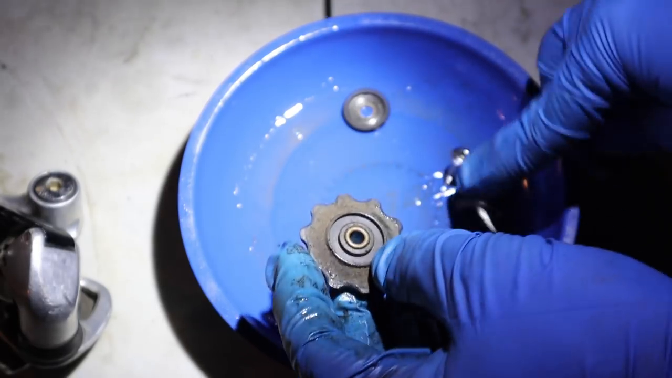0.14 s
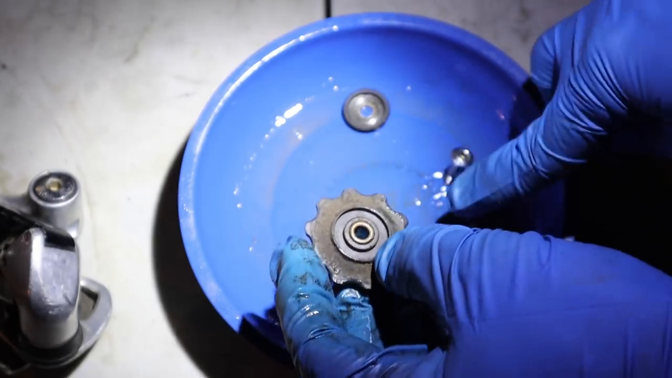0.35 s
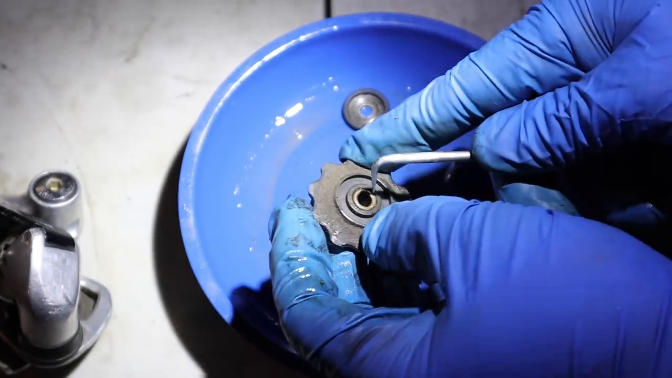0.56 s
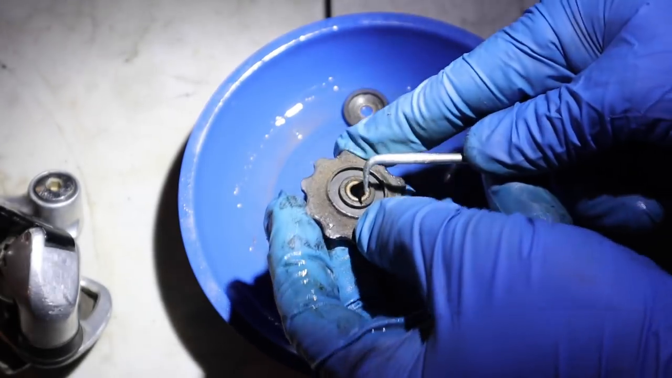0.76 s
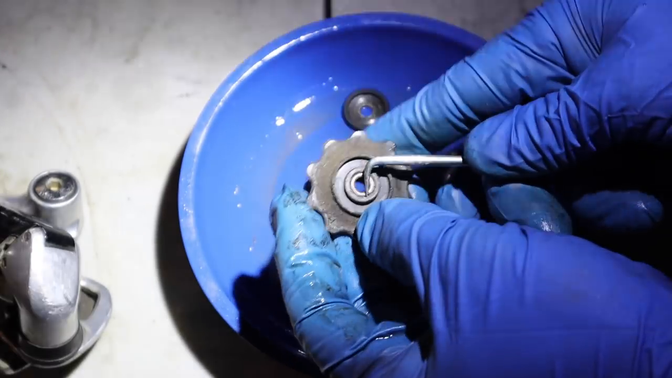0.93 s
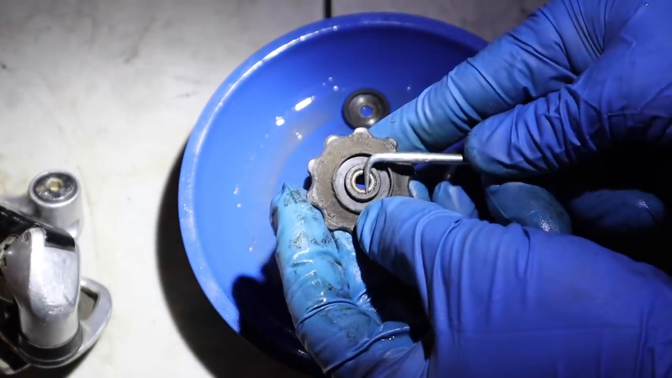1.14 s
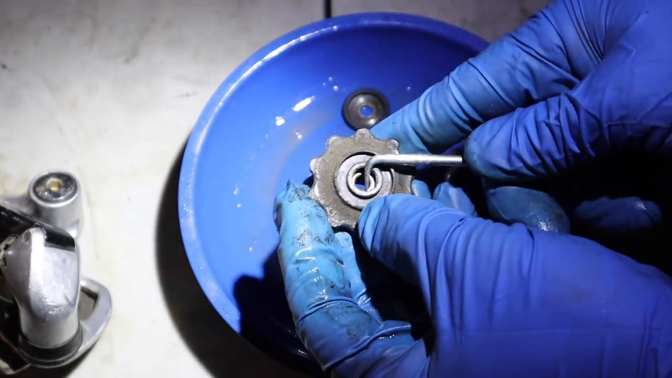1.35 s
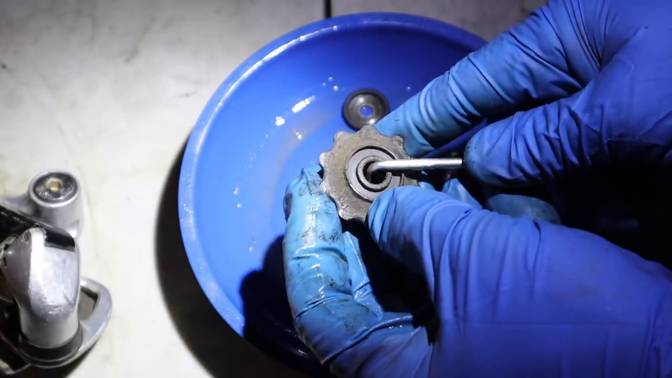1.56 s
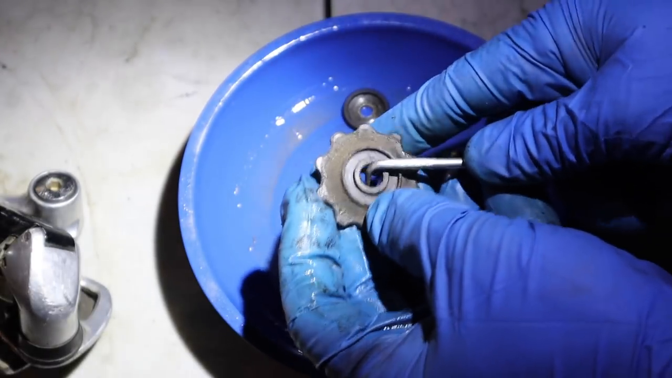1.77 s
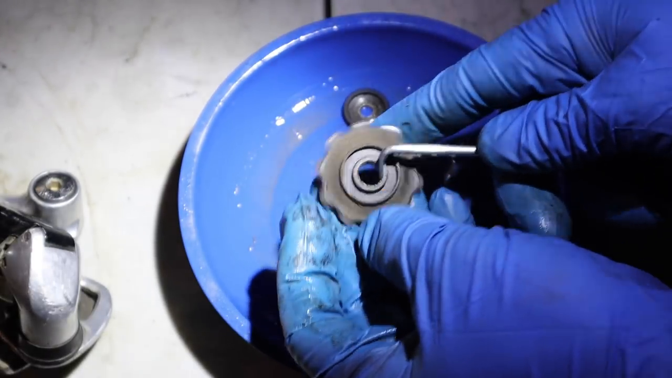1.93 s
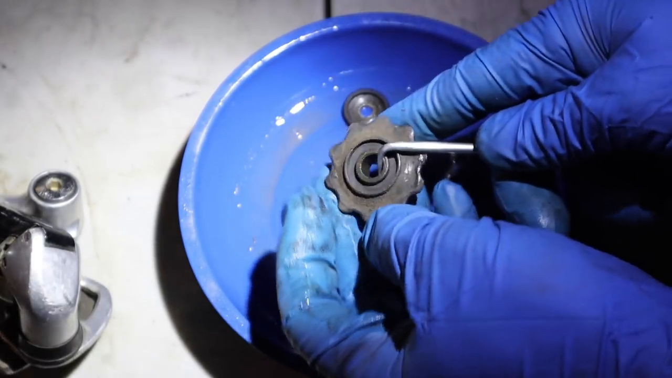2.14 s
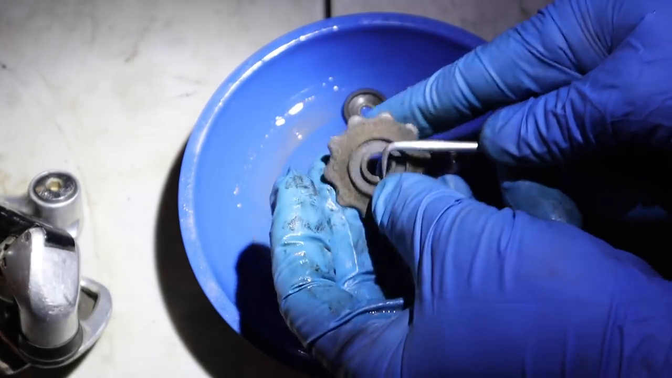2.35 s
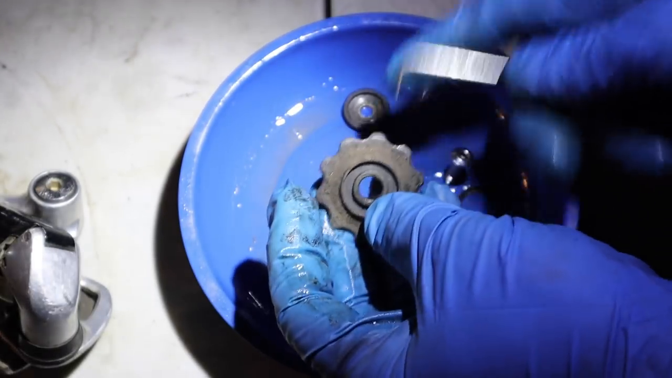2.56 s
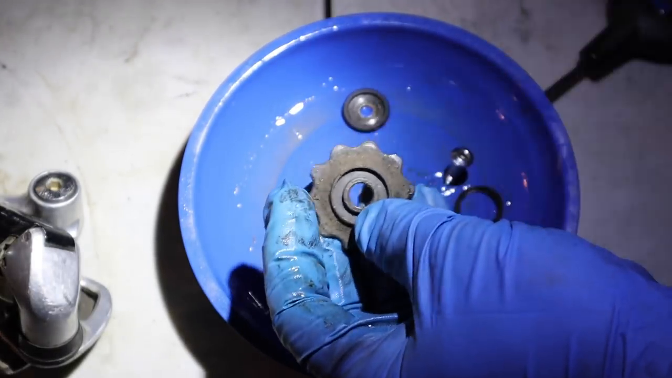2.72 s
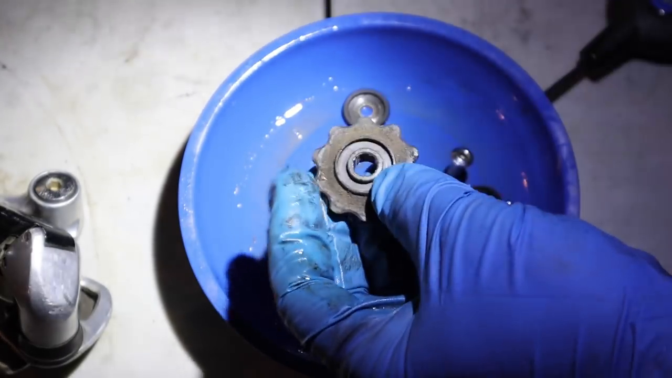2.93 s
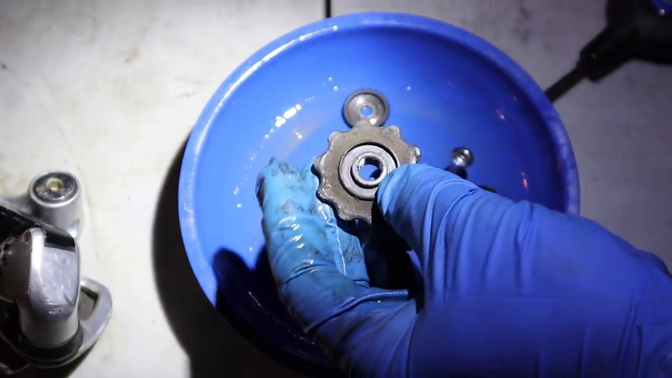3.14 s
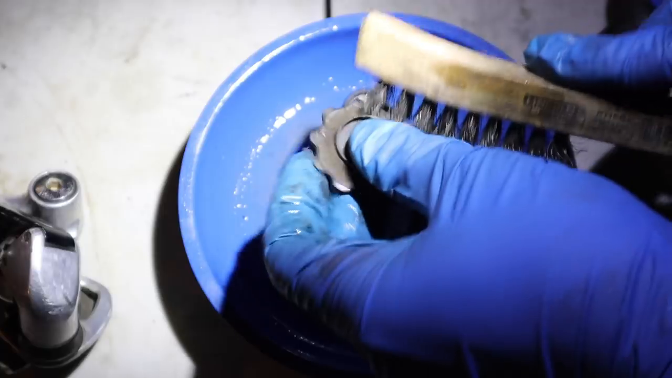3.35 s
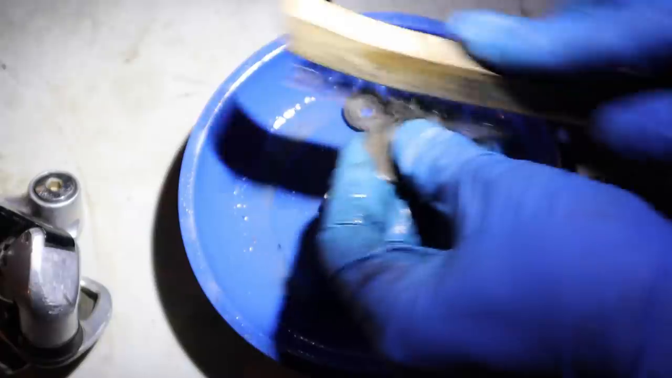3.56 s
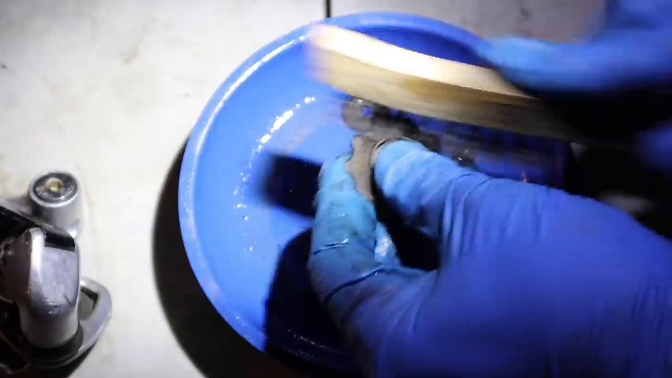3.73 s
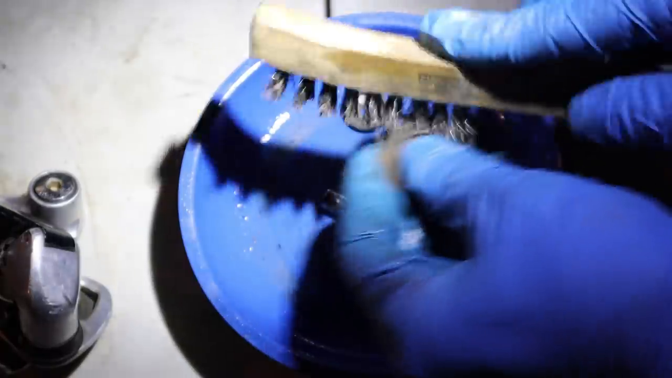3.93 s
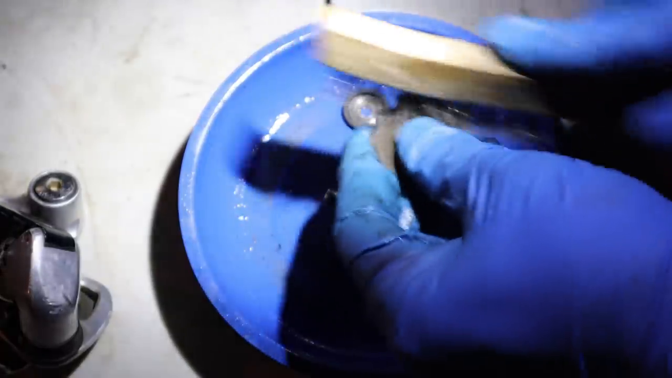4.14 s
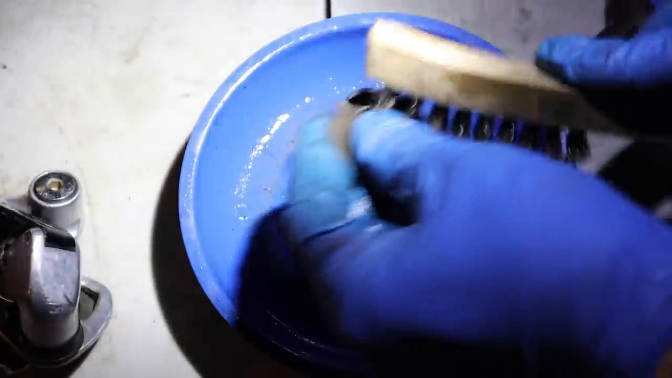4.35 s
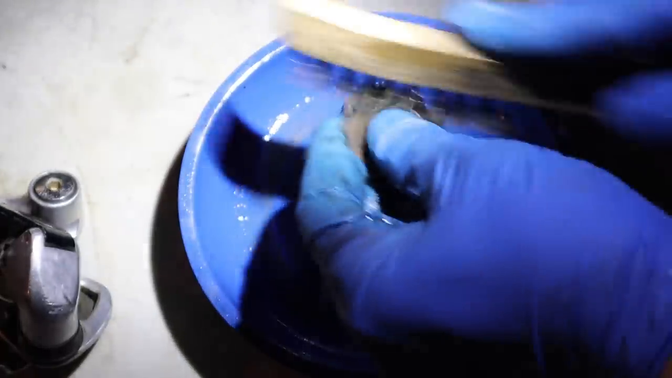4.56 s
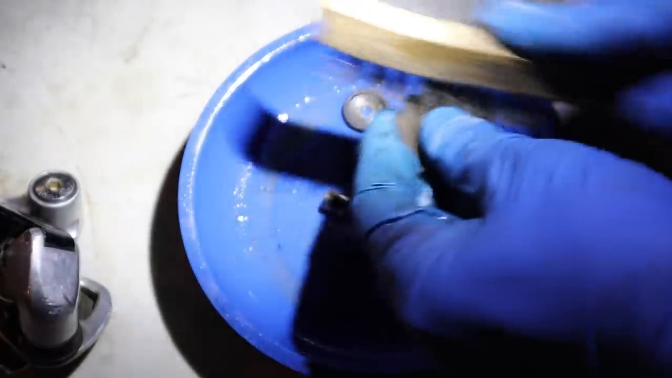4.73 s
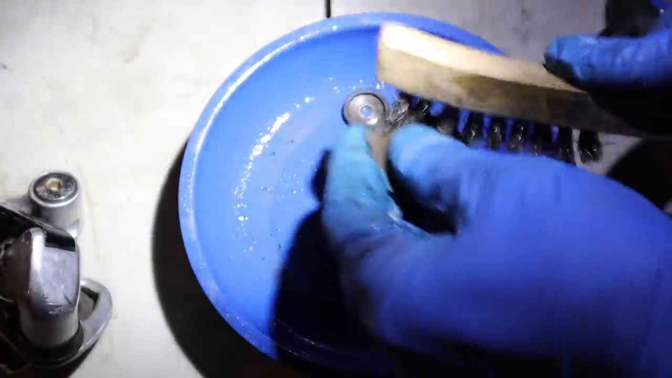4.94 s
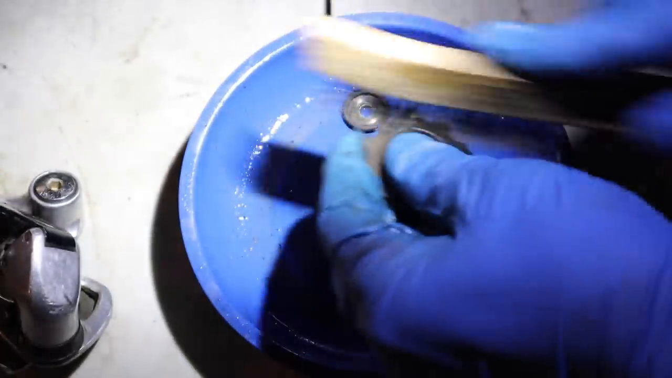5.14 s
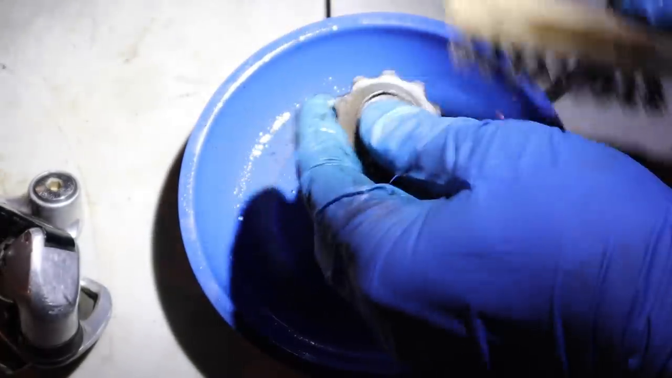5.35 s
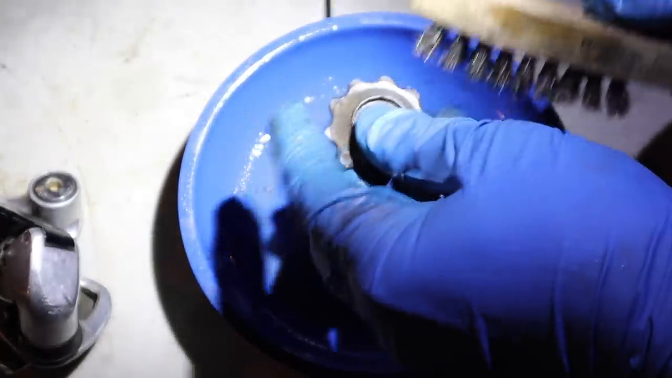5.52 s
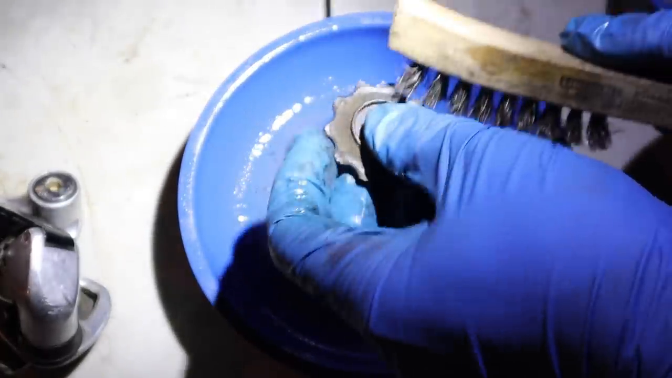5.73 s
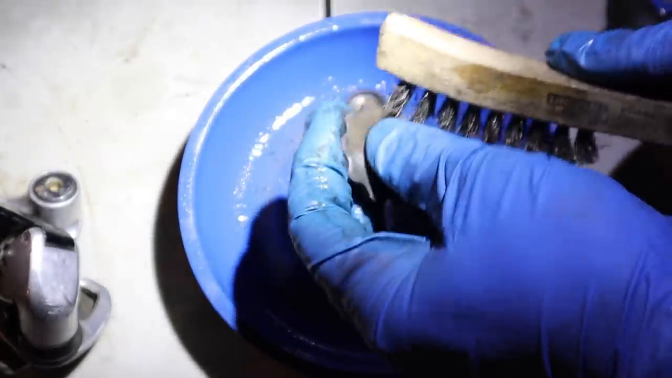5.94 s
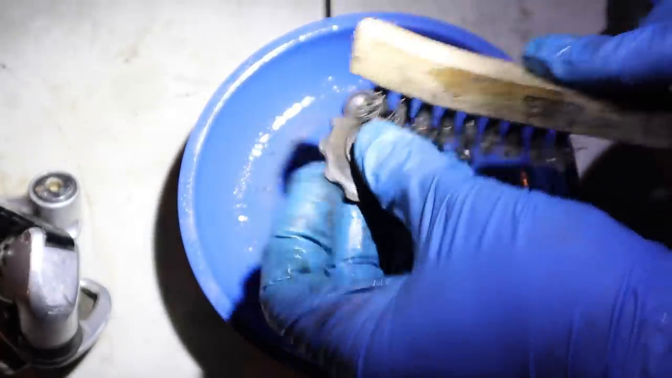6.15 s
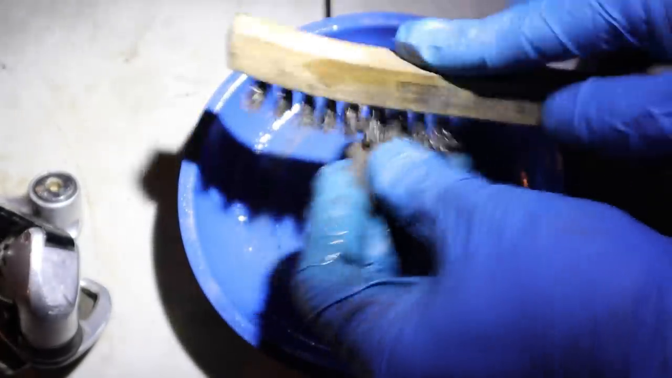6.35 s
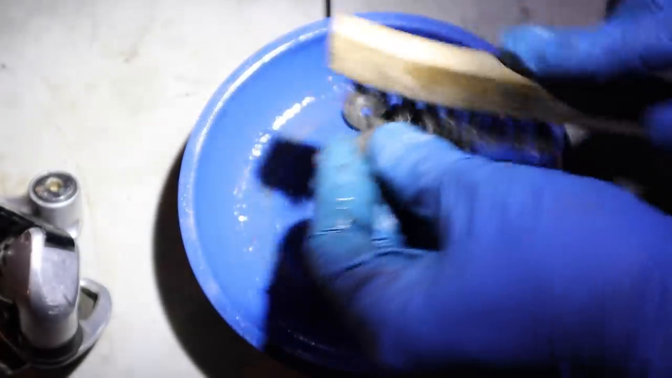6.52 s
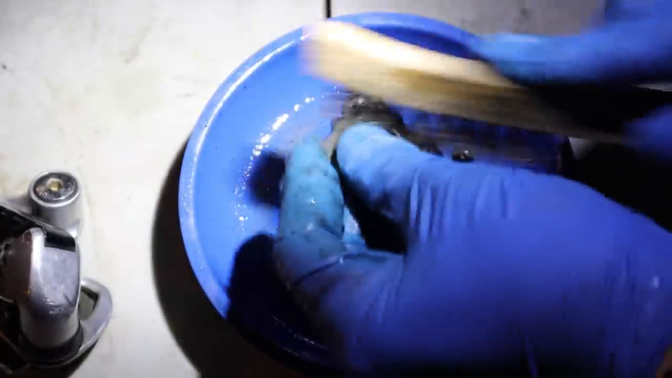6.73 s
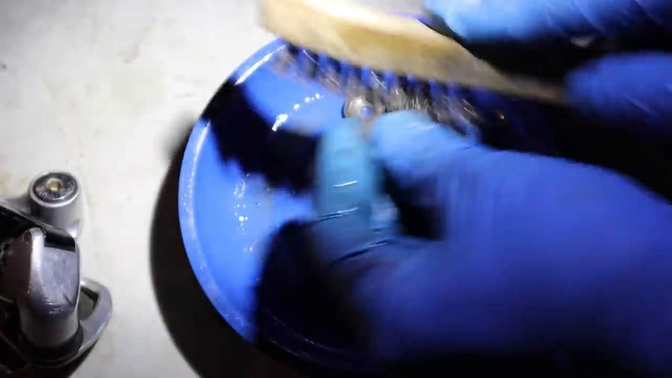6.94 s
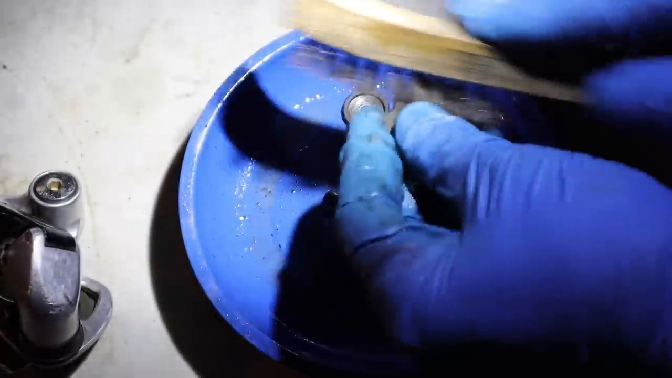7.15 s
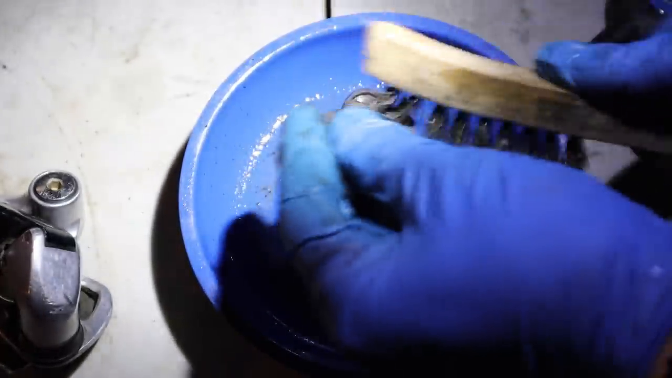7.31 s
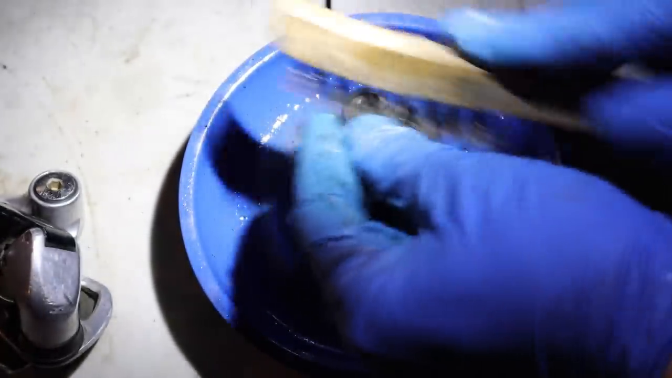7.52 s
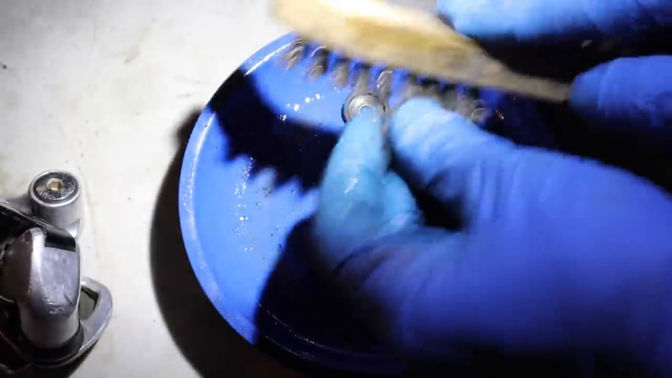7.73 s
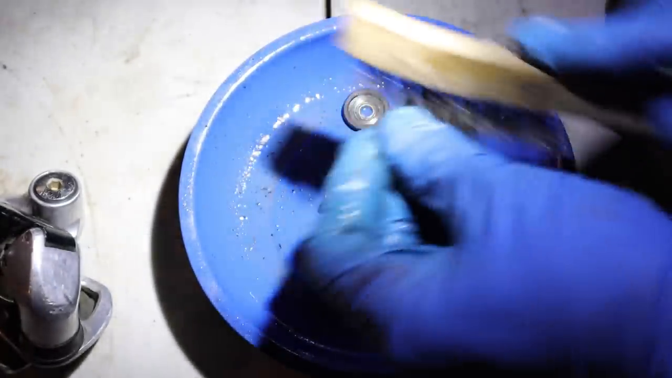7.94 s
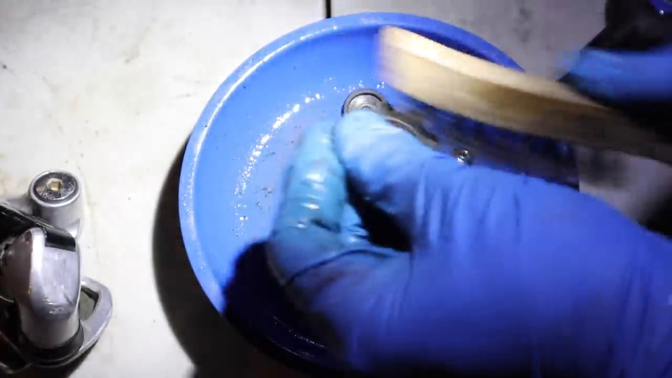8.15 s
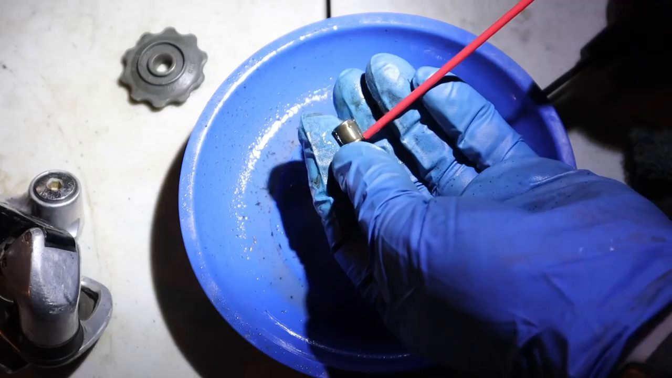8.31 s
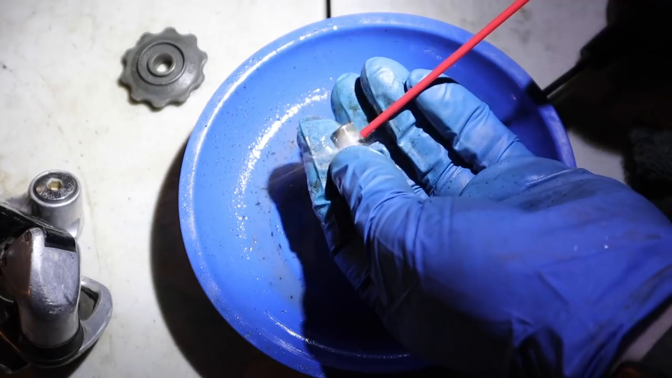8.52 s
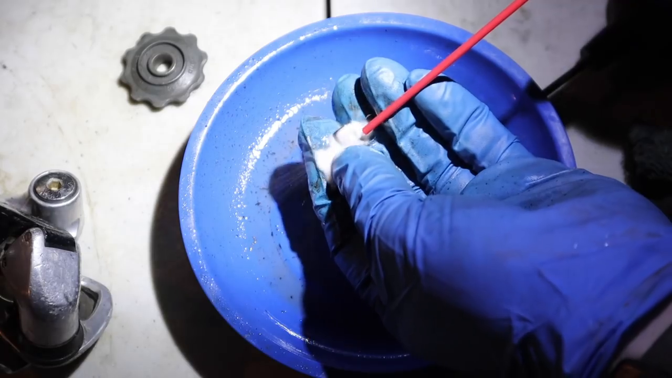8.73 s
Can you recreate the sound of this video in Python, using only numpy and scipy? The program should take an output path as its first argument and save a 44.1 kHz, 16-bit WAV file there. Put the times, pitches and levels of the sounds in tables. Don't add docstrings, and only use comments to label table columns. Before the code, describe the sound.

Close to the microphone, gloved hands pick at a small metal cog with sparse tiny clicks. A ring drops into a plastic bowl and pings twice. A wire brush then scrubs rapidly in two bright, scratchy bouts with a pause between. Finally an aerosol hisses and sputters crackling foam. Crickets pulse steadily in the background over a faint motor hum.

```python
import sys
import numpy as np
from scipy import signal
from scipy.fft import rfft, irfft
from scipy.io import wavfile

SR = 44100
rng = np.random.default_rng(int(sys.argv[2]) if len(sys.argv) > 2 else 0)


def transcribe(u):
    v = np.clip(np.atleast_2d(u).T, -1, 1)
    q = np.round(v * 32767).astype(np.int16)
    wavfile.write(sys.argv[1], SR, q)


def invert_db(level):
    return 10 ** (np.asarray(level, dtype=float) / 20)


N = 387176


def unit(x):
    return x / np.sqrt(np.mean(x ** 2))


def colour(x, spectrum):
    hz, db = np.transpose(spectrum)
    grid_hz = np.maximum(np.fft.rfftfreq(4096, 1 / SR), 1)
    cep = irfft(np.log(invert_db(np.interp(np.log(grid_hz), np.log(hz), db))))
    cep[1:2048] *= 2
    cep[2049:] = 0
    return signal.oaconvolve(x, irfft(np.exp(rfft(cep))))[:len(x)]


def band(x, lo_hz, hi_hz):
    sos = signal.butter(2, [lo_hz, min(hi_hz, .45 * SR)], "band", fs=SR, output="sos")
    return signal.sosfilt(sos, x)


def walk(rate_hz):
    levels = rng.standard_normal(4000)
    return np.interp(np.arange(N) * (rate_hz / SR), np.arange(len(levels)), levels)


def gains(tables, fade_s):
    out = np.zeros(N)
    for rows in tables:
        s, db = np.array(rows).T
        i = np.arange(max(int((s[0] - fade_s) * SR), 0), min(int((s[-1] + fade_s) * SR), N))
        edge = np.clip(1 + np.minimum(i / SR - s[0], s[-1] - i / SR) / fade_s, 0, 1)
        out[i] = np.maximum(out[i], invert_db(np.interp(i / SR, s, db)) * edge)
    return out


def gestures(rows, fade_db):
    return gains([[(start, db - fade_db), (top, db), (end, db - fade_db)] for start, top, end, db in rows], 0.018)


def grains(per_s, scatter_db):
    there, size, sign = rng.random((3, N))
    height = (size + 0.0027) ** (-scatter_db * np.log(10) / 20)
    return unit((there < per_s / SR) * height * np.sign(sign - .5))


def click(hz, ring_s):
    t = np.arange(300) / SR
    pulse = np.sin(2 * np.pi * (hz * t + rng.random())) * t * np.exp(-t / ring_s)
    return pulse / np.abs(pulse).max()


def tail(t60_s, length_s):
    t = np.arange(int(length_s * SR)) / SR
    h = rng.standard_normal(len(t)) * 1000. ** (-t / t60_s)
    return h / np.sqrt(np.sum(h ** 2))


def add(out, s, x):
    i = int(s * SR)
    out[i:i + len(x)] += x[:N - i]


def brush():
    # (start [s], end [s], level [dB], place of firmest pressure [0-1])
    strokes = [(3.582, 3.729, -32, .75), (3.788, 3.894, -32.5, 0.38), (3.931, 4.038, -32.5, 0.4),
               (4.072, 4.181, -31.5, 0.4), (4.22, 4.317, -30.5, .6), (4.366, 4.459, -30.5, 0.44),
               (4.496, 4.61, -28.5, .42), (4.657, 4.754, -31, 0.44), (4.795, 4.896, -28.5, 0.38),
               (4.932, 5.052, -32, .45), (5.085, 5.18, -29, 0.4), (5.224, 5.37, -33, 0.16),
               (6.3, 6.448, -31.5, .45), (6.496, 6.591, -32.5, 0.4), (6.644, 6.748, -30.5, 0.38),
               (6.779, 6.878, -31, 0.35), (6.923, 7.016, -29, 0.5), (7.054, 7.153, -31.5, 0.42),
               (7.191, 7.288, -27, 0.48), (7.33, 7.428, -29.5, 0.33), (7.467, 7.568, -29, 0.4),
               (7.605, 7.713, -28.5, 0.41), (7.756, 7.858, -30.5, 0.45), (7.894, 7.996, -29, 0.35),
               (8.031, 8.129, -29, 0.46), (8.164, 8.325, -31.5, 0.33)]
    # (body [dB], teeth [dB], wire ring [Hz], wire tips [dB], top [dB])
    stroke_tone = [(-9, -5, 6750, -4, -5), (-11, -6, 6600, -6, -6), (-11, -4, 6750, -5, -6),
                   (-10, -4, 6500, -4, -4), (-12, -5, 6700, -4, -7), (-13, -4, 6600, -4, -5),
                   (-11, -4, 6650, -4, -7), (-13, -3, 6600, -5, -6), (-12, -4, 6750, -6, -8),
                   (-13, -4, 6600, -5, -7), (-12, -4, 6700, -4, -7), (-11, -4, 6700, -2, -3),
                   (-14, -6, 6200, -5, -4), (-13, -5, 6200, -4, -2), (-12, -4, 6700, -3, -4),
                   (-12, -3, 6300, -2, -2), (-13, -0.8, 6700, -2, -3), (-12, -5, 6200, -3, -3),
                   (-13, -4, 6500, -4, -5), (-14, -5, 5800, -2, -5), (-13, -4, 5650, -3, -5),
                   (-12, -4, 5800, -5.5, -6), (-13, -6, 5850, -4, -5), (-15, -8, 5750, -5, -7),
                   (-14, -7, 5750, -4, -6), (-15, -5, 5800, -3, -5)]
    # (frequency [Hz], density [dB per Hz])
    bristles = [(1500, -37.5), (2400, -15.5), (3200, -11.5), (3930, -6), (5100, -7.5), (6100, -3),
                (6800, -5), (7500, -5.5), (8500, -4), (9500, -10.5), (10500, -13), (13300, -11.5),
                (15100, -16), (16500, -30)]
    # (frequency [Hz], density [dB per Hz])
    cog = [(290, -34.5), (500, -5.5), (632, -7.5), (783, 0), (1390, -4.5), (1730, 1), (1990, -1),
           (2390, -2), (2600, -3), (3380, -32.5), (5720, -120)]
    landing_db, lifting_db, off_db = -8.5, -7, -45.5
    resting_db, strays_db = -54.5, -52.5
    silent_after_s = 8.301
    t = np.arange(N) / SR

    swipes = []
    for start, end, db, firm in strokes:
        s = start + np.array([0, 1 / 8, firm, 9 / 10, 1]) * (end - start)
        swipes.append(np.c_[s, [off_db, db + landing_db, db, db + lifting_db, off_db]])
    resting = [[(3.55, resting_db), (5.38, resting_db)], [(6.25, resting_db), (8.3, resting_db)]]
    middles = [(start + end) / 2 for start, end, *_ in strokes]
    body_db, teeth_db, ring_hz, tips_db, top_db = [np.interp(t, middles, c) for c in np.array(stroke_tone).T]

    shared = grains(7000, 2.0)
    tufts = invert_db(2.5 * walk(130) + 1.5 * walk(45))
    zones = [(teeth_db + 1.8, 2300, 5000), (tips_db + 1.2, 7600, 10000), (top_db + 1.9, 10000, 16500)]
    bright = np.zeros(N)
    for db, lo_hz, hi_hz in zones:
        flicks = colour(shared + 1.1 * grains(2500, 1.8), bristles) * tufts
        bright += invert_db(db) * unit(band(flicks, lo_hz, hi_hz)) * invert_db(1.2 * walk(30))
    free_flicks = (shared + 1.1 * grains(2500, 1.8)) * tufts
    bright += invert_db(-0.2 + 1.2 * walk(30)) * wires(free_flicks, ring_hz)
    body = unit(colour(shared * tufts + rng.standard_normal(N), cog)) * invert_db(body_db + 1.5)

    strays = unit(colour(grains(160, 2.2), bristles)) * gains(resting, 0.013) * invert_db(strays_db - resting_db)
    return ((bright + body) * gains(swipes + resting, 0.014) + strays) * (np.arange(N) < silent_after_s * SR)


def wires(x, ring_hz):
    width_hz, skirt_db = 540, -9
    out, power = 0, 0
    for lo_hz in (5000, 5520, 6040, 6560, 7080):
        near = np.exp(-.5 * ((lo_hz + 260 - ring_hz) / width_hz) ** 2)
        weight = invert_db(skirt_db * (1 - near))
        out = out + weight * unit(band(x, lo_hz, lo_hz + 520))
        power = power + weight ** 2
    return out / np.sqrt(power)


def ticks():
    # (time [s], peak [dB], centre [Hz], low knock [dB])
    picks = [(1.0063, -46, 5000, -41), (1.0118, -32, 4300, -46), (1.0545, -50, 4000, -45),
             (1.2777, -36, 5000, -30.5), (1.3471, -40, 4000, -52), (1.6785, -43, 7100, -49),
             (1.89, -44, 4500, -47), (2.0274, -39, 4700, -49), (2.221, -48, 4000, -48),
             (2.277, -42, 7500, -60), (2.6362, -52, 5000, -42), (2.7495, -51, 5000, -45),
             (2.9176, -40, 5900, -54), (3.438, -30, 2600, -46)]
    # (time [s], peak [dB], centre [Hz])
    touches = [(3.2905, -39, 7500), (3.3798, -29, 13500), (3.4722, -32, 6200), (3.497, -32, 6100),
               (3.5032, -36, 4000), (3.5348, -34, 13500), (3.5448, -34, 6500), (3.5661, -34, 4000),
               (3.5815, -25, 4500), (5.3865, -31, 7200), (5.6621, -40, 13300), (5.8002, -38, 12900),
               (6.007, -30, 8500), (6.0198, -28, 9400), (6.0225, -31, 9000), (6.0285, -36, 9500),
               (6.0396, -40, 9100), (6.1024, -31, 9300), (6.1158, -20, 9400), (6.1164, -26, 3700),
               (6.117, -29, 13500), (6.1283, -34, 5300), (6.1354, -34, 5000), (6.1616, -26, 9600),
               (6.1895, -30, 5950), (6.2606, -37, 6200), (6.271, -32, 4200), (6.287, -30, 6100),
               (6.2967, -25, 6300)]
    # (time [s], peak [dB], centre [Hz])
    bristle_snaps = [(3.6064, -23, 6900), (3.6337, -20, 13000), (3.6606, -19, 6600), (3.6842, -19, 6700),
                     (3.7247, -26, 6800), (3.7922, -29, 6400), (3.8154, -11, 6500), (3.8297, -15, 6100),
                     (3.8387, -16, 5900), (3.9478, -20, 6000), (3.9518, -19, 6700), (3.9862, -19, 4900),
                     (3.9999, -19, 6900), (4.0025, -22, 7400), (4.0281, -22, 6800), (4.0302, -21, 5000),
                     (4.0656, -26, 7600), (4.0769, -28, 6500), (4.1322, -17, 6100), (4.1454, -19, 4000),
                     (4.1485, -19, 7900), (4.1845, -29, 6200), (4.2319, -20, 6500), (4.2356, -21, 5900),
                     (4.2468, -17, 5800), (4.2492, -16, 6600), (4.2581, -17, 6500), (4.2695, -16, 6000),
                     (4.2728, -15, 8300), (4.2788, -14, 6800), (4.2952, -19, 7800), (4.3097, -22, 7600),
                     (4.3219, -27, 4300), (4.3459, -31, 8500), (4.3786, -21, 6300), (4.381, -22, 8300),
                     (4.4903, -30, 6100), (4.5125, -22, 4000), (4.5241, -14, 5700), (4.5368, -15, 8000),
                     (4.5506, -15, 6600), (4.5923, -19, 6600), (4.6235, -27, 14200), (4.6534, -23, 6900),
                     (4.657, -29, 7700), (4.6904, -18, 6300), (4.7578, -31, 6300), (4.8085, -18, 7000),
                     (4.9383, -27, 6800), (4.9692, -15, 6700), (4.9754, -16, 8000), (4.9896, -17, 6500),
                     (5.0532, -30, 6400), (5.1086, -17, 6700), (5.1379, -15, 6700), (5.1649, -19, 9100),
                     (5.1816, -23, 6700), (5.3629, -19, 9100),
                     (6.3108, -27, 5700), (6.3259, -25, 5200), (6.3291, -16, 6200), (6.3411, -13, 6400),
                   (6.3529, -10, 6100), (6.3771, -15, 6300), (6.3858, -11, 6300), (6.3902, -18, 6000),
                   (6.3972, -15, 12900), (6.4094, -13, 5900), (6.4328, -24, 12300), (6.5006, -17, 6300),
                   (6.5045, -21, 6300), (6.5265, -20, 6400), (6.5318, -14, 6200), (6.5642, -21, 5900),
                   (6.6595, -20, 6300), (6.6642, -23, 6000), (6.7016, -14, 6200), (6.7164, -17, 7500),
                   (6.7197, -19, 7800), (6.7432, -27, 8900), (6.7956, -19, 5600), (6.8456, -17, 8900),
                   (6.8517, -20, 6000), (6.9295, -26, 6100), (6.949, -18, 5400), (6.9638, -14, 7700),
                   (7.2034, -20, 5900), (7.2111, -20, 9100), (7.2241, -16, 7800), (7.2833, -24, 7500),
                   (7.3276, -29, 5100), (7.3449, -20, 8100), (7.352, -16, 4500), (7.4778, -23, 8100),
                   (7.5116, -14, 8300), (7.5235, -19, 3200), (7.5627, -24, 3800), (7.6085, -22, 3200),
                   (7.626, -19, 4700), (7.6455, -18, 3300), (7.6996, -20, 5800), (7.7739, -22, 5800),
                   (7.7856, -12, 6400), (7.854, -25, 5600), (7.8962, -28, 8400), (7.9182, -16, 7800),
                   (7.9299, -15, 6200), (8.0389, -27, 8000), (8.0757, -13, 5900), (8.1104, -15, 6000),
                   (8.1763, -23, 8100), (8.1785, -24, 5300), (8.198, -18, 5900)]
    touch_db, touch_knock_db, snap_db = -0.5, -16.5, -4
    fellow_db, fellow_s = -6, .0013

    hits = list(picks)
    hits += [(s, db + touch_db, hz, db + touch_knock_db) for s, db, hz in touches]
    snaps = [(s, db + snap_db, hz, -60) for s, db, hz in bristle_snaps]
    hits += snaps
    for s, db, hz, low_db in snaps:
        for a, b, c in rng.standard_normal((2, 3)):
            hits.append((s + fellow_s * a, db + fellow_db + 2 * b, hz * (1 + .1 * c), low_db))

    out = np.zeros(N)
    for s, db, hz, low_db in hits:
        crack = sum(click(f, 0.00015) for f in (3600, 4830, 6500, 8850, 11200, 13500))
        add(out, s - .0002, invert_db(db + 1.0) * (0.65 * click(hz, 0.00036) + 0.27 * crack))
        add(out, s - .0006, invert_db(low_db + 1.3) * click(1660, 0.00062))
    return out


def ring():
    # (frequency [Hz], level [dB], t60 [s])
    ring_modes = [(650, -42, .02), (1140, -30, .007), (1650, -13, .005), (2610, 0, .066),
                  (3300, -8.5, .006), (4645, -26, 0.055), (5023, -28, 0.06), (5243, -24, .04),
                  (7630, -33, .045), (8230, -37, .05), (8600, -17, 0.014), (9450, -17, .018),
                  (11000, -22, 0.025), (13800, -26, .01)]
    # (time [s], level [dB], stopped after [s], crack [dB], upper modes [dB])
    drops = [
        (2.3748, -1, .1, -12, -2.5),
        (2.4524, -2, 0.017, -22, -5),
        (2.4553, -32, .016, -19.5, 18),
    ]
    pulse_db, pulse_s = -21, 0.00066
    out, t = np.zeros(N), np.arange(int(.12 * SR)) / SR
    contact = np.sin(np.pi / 2 * np.minimum(t / .0002, 1)) ** 2
    for s, db, stop_s, crack_db, upper_db in drops:
        stopped = np.exp(-np.maximum(t - stop_s, 0) / 0.0018)
        modes = np.zeros(len(t))
        for k, (hz, mode_db, t60_s) in enumerate(ring_modes):
            gain = (-1) ** k * invert_db(mode_db + upper_db * (hz > 6000))
            mode = gain * np.sin(2 * np.pi * hz * t) * 1000. ** (-t / t60_s)
            modes += mode * (stopped if hz < 4000 else 1)
        crack = band(rng.standard_normal(len(t)), 520, 11300) * np.exp(-t / 0.0021)
        add(out, s, invert_db(db) * modes * contact + invert_db(crack_db) * crack)
    add(out, drops[0][0], invert_db(pulse_db) * np.sin(np.pi * np.minimum(t / pulse_s, 1)) ** 2)
    return out


def spray():
    # (frequency [Hz], density [dB per Hz])
    gas = [(500, -36), (700, -19), (1100, -19), (1500, -10.5), (2100, -3), (2500, -8), (3450, -1.5),
           (4550, -15), (5700, -4.5), (7200, -12), (8400, -3), (9700, -10), (10400, -23), (11500, -17),
           (13700, -15), (16000, -20)]
    # (frequency [Hz], density [dB per Hz])
    nozzle = [(150, -42), (250, -14.5), (1000, -17), (1700, -12), (2100, -9), (2420, -13), (2800, -4),
              (3500, -3.5), (4450, -16), (5100, -6), (5900, -3.5), (6750, -9), (7400, -5), (8250, 1),
              (9700, -2.5), (10400, -17), (11500, -9), (12500, -11), (13900, -5.5), (14800, -10),
              (15500, -6), (16200, -16)]
    # (time [s], level [dB])
    jet = [
        (8.57, -45),
        (8.6, -32),
        (8.63, -26.5),
        (8.69, -25),
        (8.78, -25.5),
    ]
    # (time [s], peak [dB])
    sputters = [(8.6087, -15), (8.6106, -16), (8.6168, -15), (8.6217, -8), (8.6313, -15), (8.6343, -14),
                (8.6368, -12), (8.638, -1), (8.6484, -6), (8.6541, -6), (8.6612, -4), (8.6694, -11),
                (8.6732, -13), (8.6768, -8), (8.6799, -8), (8.6814, -10), (8.6839, -3), (8.6895, -5),
                (8.695, -5), (8.6982, -9), (8.7002, -12), (8.7039, -5), (8.706, -5), (8.7082, -12),
                (8.7096, -3), (8.7193, -3), (8.7241, -13), (8.7255, -8), (8.7288, -8), (8.7301, -13),
                (8.7336, -13), (8.7395, -13), (8.741, -9), (8.743, -14), (8.7447, -7), (8.7544, -7),
                (8.7563, -11), (8.7631, -14), (8.7685, -7), (8.7743, -7), (8.776, -14), (8.7779, -11)]
    start_s, gas_db, pop_db, pop_rough = 8.509, -30.5, 0.3, .3
    opened = np.clip((np.arange(N) / SR - start_s) / 0.0009, 0, 1)
    out = unit(colour(grains(12000, 1.5), gas)) * opened * invert_db(gas_db)
    out += unit(colour(grains(9000, 1.9), nozzle)) * gains([jet], 1) * opened
    fray = np.exp(-np.arange(200) / SR / 0.00012)
    for s, db in sputters:
        burst = pop_rough * rng.standard_normal(200) * fray
        burst[0] = -1.5
        pop = colour(burst, nozzle)
        add(out, s - .0001, invert_db(db + pop_db) * pop / np.abs(pop).max())
    return out


def hands():
    # (frequency [Hz], density [dB per Hz])
    glove = [(2000, -25), (4500, 0.5), (8500, 1), (11000, -7.5), (14000, -4), (16000, -14)]
    # (start [s], loudest [s], end [s], level [dB])
    rustles = [(.06, .14, .36, -59), (.3, .48, .5, -58), (.91, .94, 1.07, -58), (1.97, 2.03, 2.08, -57.5),
               (2.7, 2.98, 3.04, -57.5), (3.07, 3.2, 3.24, -57), (3.26, 3.36, 3.4, -55),
               (3.42, 3.49, 3.53, -50.5), (3.54, 3.58, 3.2, -50), (5.38, 5.39, 5.42, -61),
               (5.55, 5.98, 6.3, -58.5), (6, 6.02, 6.035, -47), (6.09, 6.118, 6.16, -47),
               (6.15, 6.19, 6.25, -55), (6.22, 6.3, 5.6, -48)]
    # (start [s], loudest [s], end [s], level [dB])
    rubs = [(0, .14, .5, -60), (.53, .6, 1.1, -52), (.8, 1.2, 1.5, -49.5), (1.3, 1.98, 2.05, -51),
            (2.06, 2.3, 2.36, -52), (2.8, 3.27, 4.5, -61), (5.39, 6.03, 6.08, -51.5),
            (6.09, 6.11, 6.3, -45), (6.23, 6.3, 6.5, -46)]
    # (time [s], peak
    # [dB], centre [Hz])
    bumps = [(1.054, -40, 240), (2.112, -37, 497), (2.454, -33, 400), (3.005, -40, 343), (3.223, -37, 223),
             (3.264, -35, 293), (3.282, -34, 330), (3.304, -33, 231), (8.6215, -37, 700), (8.638, -39, 900),
             (6.116, -42, 226)]
    out = unit(colour(grains(7000, 4.0), glove)) * gestures(rustles, 7.5) * invert_db(2.0)
    out += unit(band(rng.standard_normal(N), 576, 1150)) * gestures(rubs, 6) * invert_db(-3.0)
    t = np.arange(int(.05 * SR)) / SR
    for s, db, hz in bumps:
        thump = unit(band(rng.standard_normal(len(t)), 0.74 * hz, 1.31 * hz))
        add(out, s, invert_db(db + 2.5) * thump * .6 * np.exp(-t / .012))
    return out


def crickets():
    # (carrier [Hz], spread [Hz], pulse rate [per s], group [0 swells, 1 even throb], level [dB])
    wings = [(2978, 85.3, 55, 0, 1), (3621, 58, 48, 1, -55), (3357, 79, 50, 1, -60),
             (6020, 198, 55, 0, -23)]
    throb_hz, throb_s, throb_db = 4.375, 0.11, 2
    t = np.arange(int(.013 * SR)) / SR
    echo = tail(.45, 0.41)
    echo[0] = invert_db(-20)
    beat = np.cos(2 * np.pi * throb_hz * (np.arange(N) / SR - throb_s))
    level = swells(), invert_db(throb_db * beat + 1.0 * walk(4.05))
    out = np.zeros(N)
    for hz, spread_hz, rate_hz, group, db in wings:
        song = np.zeros(N)
        for offset in (-1.3, -.6, -.1, .1, .6, 1.3):
            chance = rng.standard_normal((700, 3))
            starts = np.cumsum((1 + .2 * chance[:, 0]) / (rate_hz * (1 + .05 * offset))) - .3
            pitch_hz = hz + spread_hz * (1 + offset + .7 * chance[:, 1:2])
            sagging_hz = pitch_hz - spread_hz * t / t[-1]
            pulses = np.sin(2 * np.pi * t * sagging_hz) * np.sin(np.pi * t / t[-1]) ** 2
            pulses = pulses * invert_db(1.5 * chance[:, 2:])
            place = (starts[:, None] * SR).astype(int) + np.arange(len(t))
            inside = (place >= 0) & (place < N)
            np.add.at(song, place[inside], pulses[inside])
        out += unit(signal.oaconvolve(song, echo)[:N]) * level[int(group)] * invert_db(db)
    return out


def swells():
    # (peak [s], level [dB], half length [s])
    bell_rows = [(0.04, -32.5, 0.06), (0.397, -34.5, 0.093), (0.696, -34.5, 0.088), (1.09, -35, 0.149),
                 (1.456, -34.0, 0.084), (1.807, -36.0, 0.154), (2.19, -36, 0.14), (2.31, -37, 0.05),
                 (2.627, -40.0, 0.196), (3.017, -35.0, 0.1), (3.345, -36.5, 0.15), (3.648, -34.5, 0.081),
                 (4.01, -36, 0.18), (4.41, -35.5, 0.11), (4.768, -35.5, 0.14), (5.145, -34.5, 0.13),
                 (5.528, -33.5, 0.097), (5.895, -34.0, 0.097), (6.255, -34.0, 0.09), (6.63, -34.5, 0.089),
                 (6.994, -34.5, 0.088), (7.348, -34, 0.092), (7.698, -33.5, 0.11), (8.09, -33.5, 0.086),
                 (8.404, -33.5, 0.084)]
    last_swell, murmur_db = (8.77, -33, .12), -49
    t = np.arange(0, N / SR, 1 / 500)
    power = invert_db(2 * murmur_db)
    for s, db, half_s in bell_rows + [last_swell]:
        power = power + invert_db(2 * (db - 3)) * np.exp(-((t - s) / half_s) ** 2)
    return np.interp(np.arange(N) / SR, t, np.sqrt(power))


def room():
    # (frequency [Hz], density [dB per Hz])
    air = [(20, -23), (45, -2.5), (90, -2.5), (150, 2.5), (230, 1.5), (450, -3), (1000, -8), (1400, -13),
           (2100, -15.5), (4400, -21), (7500, -23), (11000, -26.5), (15000, -27), (16500, -38)]
    # (frequency [Hz], rms level [dB])
    hum = [(115.5, -52.5), (233, -58.5), (166, -63), (353, -66)]
    t = np.arange(N) / SR
    out = unit(colour(rng.standard_normal(N), air)) * invert_db(-47.5 + 0.94 * walk(3.045))
    for hz, db in hum:
        level = invert_db(db + 3 + 1.4 * walk(5.5))
        out += level * np.sin(2 * np.pi * hz * t + 0.84 * walk(5.6))
    return out


def scene():
    near = brush() + ticks() + ring() + spray()
    echo = band(tail(0.074, .15), 400, 9000)
    bench = signal.fftconvolve(near, echo)[:N] * invert_db(-23.5)
    return (near + bench + hands() + crickets() + room())[None]


def roll_off(x):
    return signal.sosfilt(signal.butter(12, 17040, fs=SR, output="sos"), x)


def record(dry):
    top = signal.ellip(8, .2, 60, 15800, fs=SR, output="sos")
    mix = np.clip(signal.sosfilt(top, dry), -1, 1)
    return roll_off(mix)


dry = scene()
out = record(dry)
transcribe(out)
```